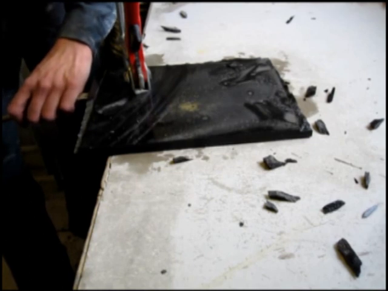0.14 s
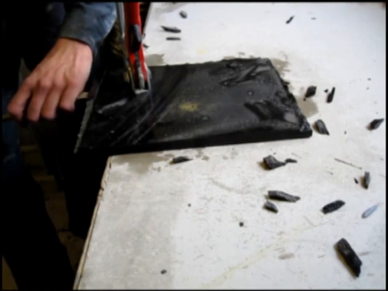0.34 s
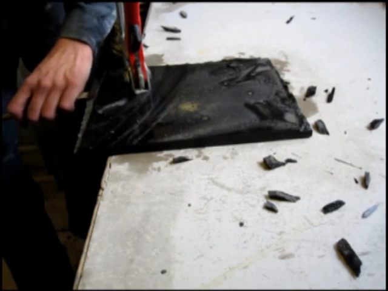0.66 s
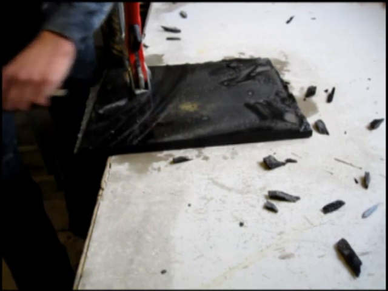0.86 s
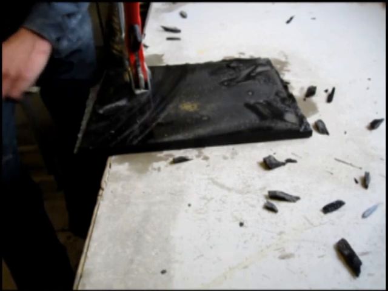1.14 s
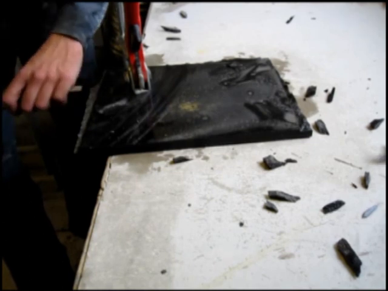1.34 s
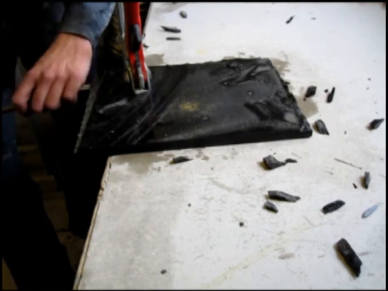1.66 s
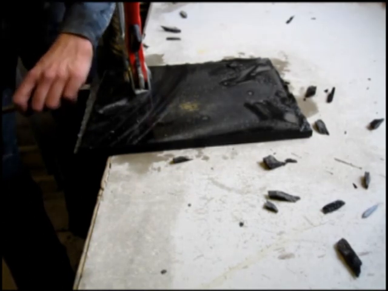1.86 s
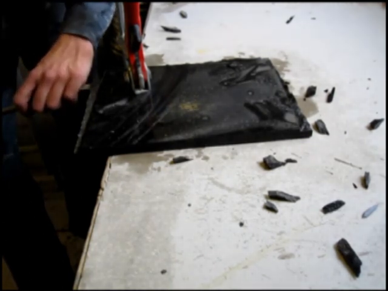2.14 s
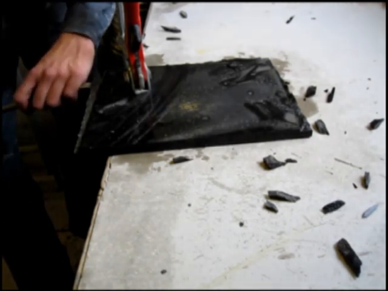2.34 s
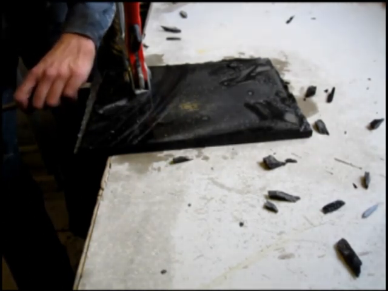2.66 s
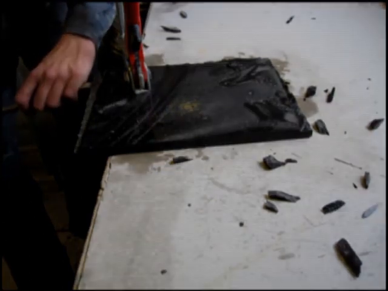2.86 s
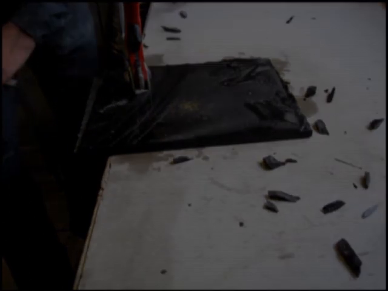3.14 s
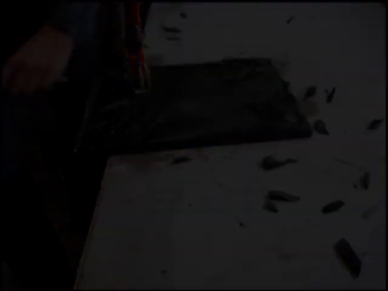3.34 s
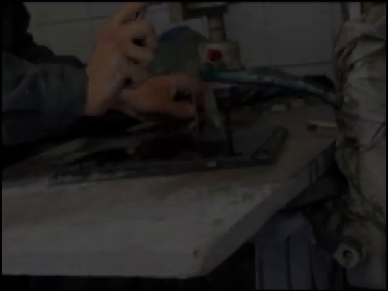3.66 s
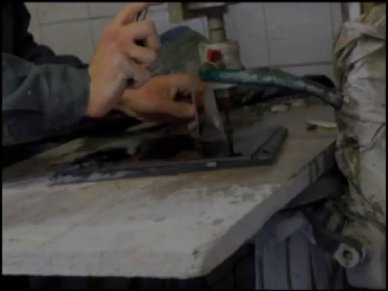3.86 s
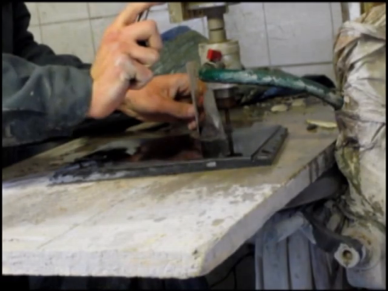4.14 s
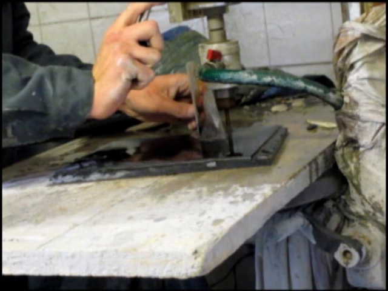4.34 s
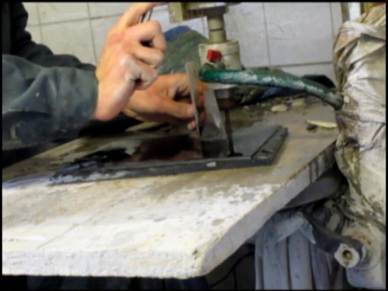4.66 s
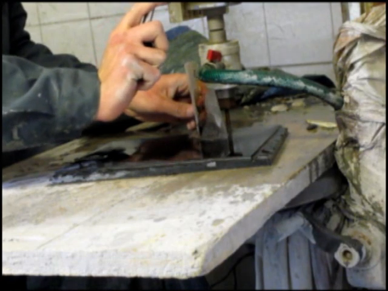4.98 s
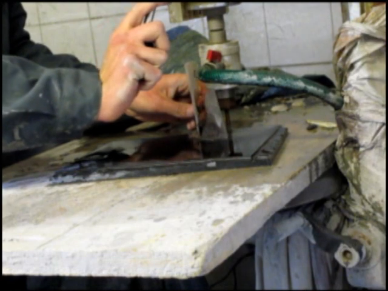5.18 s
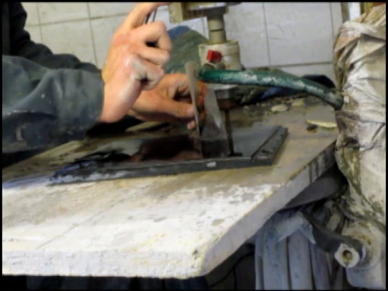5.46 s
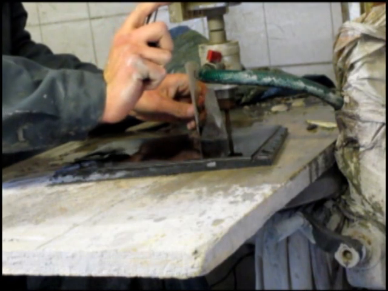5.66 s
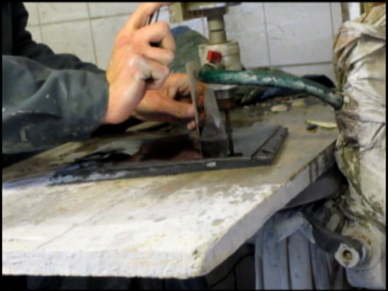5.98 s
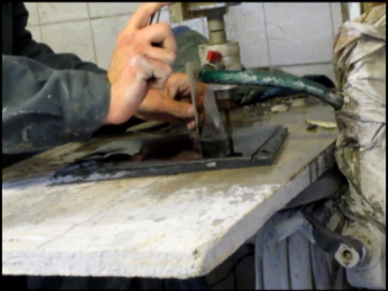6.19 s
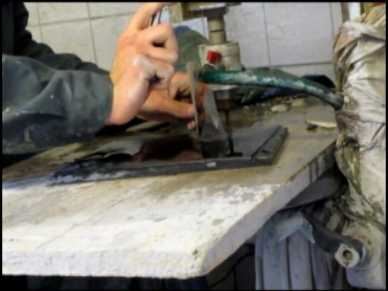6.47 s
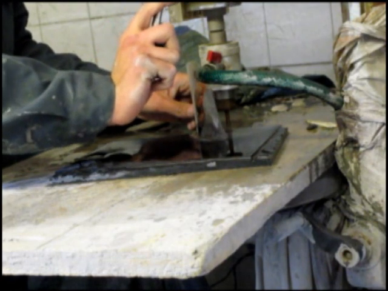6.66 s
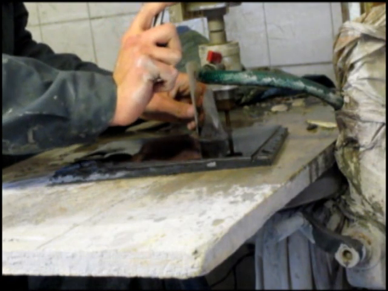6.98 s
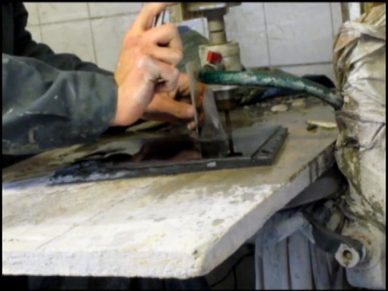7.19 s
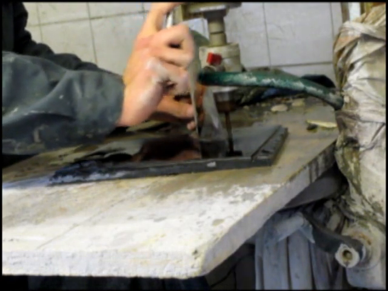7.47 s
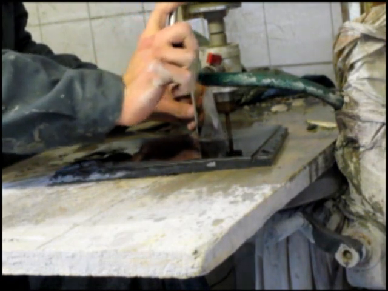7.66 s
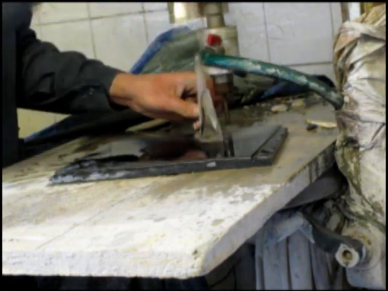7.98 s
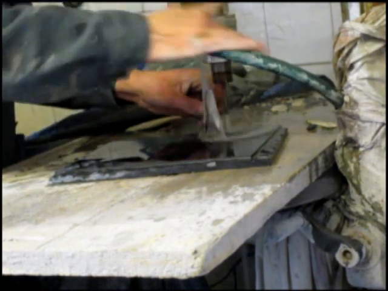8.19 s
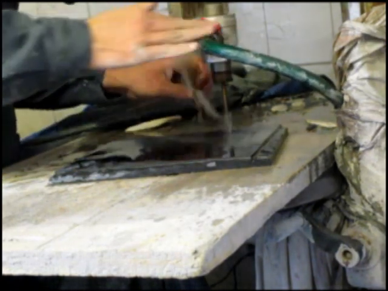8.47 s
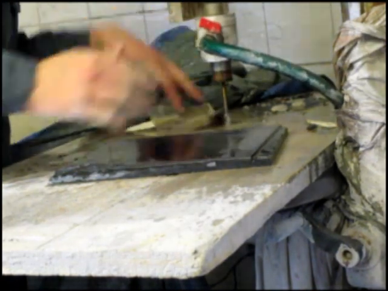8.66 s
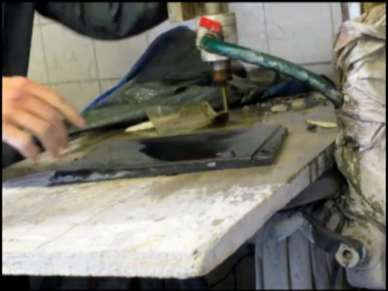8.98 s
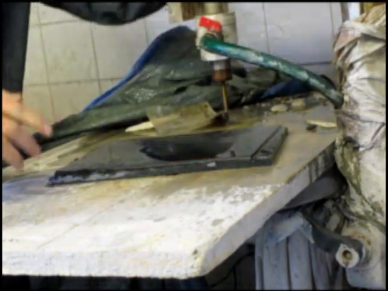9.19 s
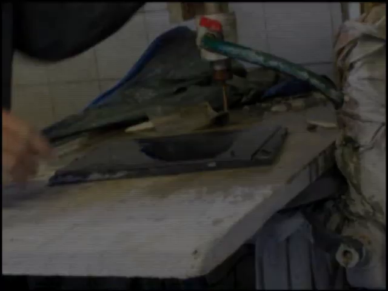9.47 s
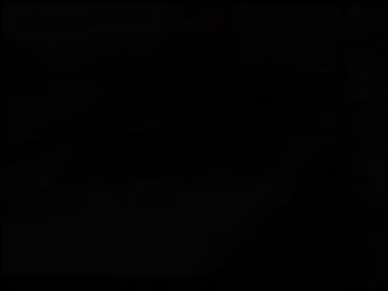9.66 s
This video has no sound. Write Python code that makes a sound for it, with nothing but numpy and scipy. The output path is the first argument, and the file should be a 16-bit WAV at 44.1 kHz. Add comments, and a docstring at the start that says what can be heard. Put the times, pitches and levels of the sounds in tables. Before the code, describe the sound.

A faint hiss and small motor whirr fill a tiled workshop while a stone slab shifts softly on a bench. A hammer strikes a chisel at about 0.8, 1.3 and 3 seconds, giving sharp stone cracks with a short room echo. The first and last thud the bench and ring the steel; the second is crunchier, with flakes clicking down close by. Quiet knocks and scrapes follow around 1.8 to 2.4 seconds. Everything fades out by 3.5 seconds.

A water-fed drill then fades in, grinding steadily into stone over a rough motor hum. At about 7.5 seconds it lifts and spins free with a high singing tone, a click and a hiss of spray. Small splashes follow from 8 to 9.2 seconds. The splash guard clinks near 9.5 seconds as the drill fades away, ending around 9.7 seconds.

```python
"""A stonemason's tiled workshop. Three hammer blows on a chisel chip a granite slab: the stone cracks,
the bench thuds, the steel rings, flakes land. Gain control ducks each blow and lets the room swell back.
After a fade, a water-fed drill grinds into the slab, is lifted and runs free, flinging spray;
its splash guard and feed lever click."""
import sys
import numpy as np
from scipy import signal
from scipy.fft import rfft, irfft, next_fast_len
from scipy.io import wavfile
from scipy.ndimage import uniform_filter1d, map_coordinates

SR = 44100
rng = np.random.default_rng(int(sys.argv[2]) if len(sys.argv) > 2 else 0)


def generate_wav(sig):
    """Save sig (samples, or channels by samples) to the path in sys.argv[1] as 16-bit PCM at SR."""
    pcm = np.round(np.clip(np.atleast_2d(sig).T, -1, 1) * 32767).astype(np.int16)
    wavfile.write(sys.argv[1], SR, pcm)


N = 433493
T = np.arange(N) / SR
EVENT_SAMPLES = SR // 2
DRILL_START_S, LIFT_S, END_S = 3.52, 7.45, 9.739


# hammer blows: start_s, crack_db, thud_db, ring_db, crunch_db, touch_lead_s, touch_db, rock_db
HAMMER_BLOWS = [(0.8243, 10, 5, 1.5, -6, 0.011, -24.5, -6),
                (1.3453, 3, -12.5, -31.5, 4.5, .016, -14.5, -38),
                (2.9854, 13, 6, -9.5, -10.5, 0.019, -34, -18)]
# chisel and slab modes, before tilt: pitch_hz, level_db
CHISEL_MODES = [(1055, -20), (1147, -2), (2046, -12.5), (2476, 8), (2536, 4.5), (2789, -7.5), (3381, -10),
                (3817, -20.5), (4005, 3.5), (4048, 3.5), (5044, -17), (5523, -10), (7095, -21), (8463, -15),
                (10520, -27)]
# bench frame modes, before tilt: pitch_hz, level_db
BENCH_FRAME_MODES = [(545, 3.5), (830, 0), (375, -4)]
def chisel(tilt_db_per_oct=5, ring_t60_s=0.11, drone_t60_s=2.1):
    """The edge touches lightly; the blow then cracks the stone and rings the steel and the bench."""
    out = np.zeros(N)
    for start_s, crack_db, thud_db, ring_db, crunch_db, touch_lead_s, touch_db, _ in HAMMER_BLOWS:
        touch = contact(touch_db, thud_db - 31.5, tilt_db_per_oct=9, t60_s=0.006)
        add(out, start_s - touch_lead_s, touch)
        add(out, start_s, contact(crack_db, thud_db, tilt_db_per_oct, t60_s=0.033))
        ring = amp(ring_db) * ringing(CHISEL_MODES, tilt_db_per_oct) * decay(ring_t60_s, rise_s=0.00077)
        crunch = amp(crunch_db) * band(4540, width_oct=0.67) * decay(0.035, rise_s=0.00068)
        add(out, start_s, room(np.pad(ring + crunch, (0, EVENT_SAMPLES)), wet_db=-3))
        drone = amp(thud_db - 41) * ringing(BENCH_FRAME_MODES, tilt_db_per_oct)
        add(out, start_s, drone * decay(drone_t60_s, rise_s=0.01))
    return out


# stone crack, before tilt: freq_hz, density_db
CRACK_SPECTRUM = [(180, -43.5), (300, -22.5), (593, -22), (870, -10.5), (1120, 6), (1660, -5.5), (2000, 6),
                  (2980, -3.5), (4020, -3), (4520, -7), (8640, -16), (12700, -25.5), (16000, -45.5)]
# slab thumping the bench: freq_hz, density_db
THUD_SPECTRUM = [(25, -17.5), (70, -18.5), (140, -14.5), (250, -8), (480, -3), (750, -1.5), (1100, 0.5),
                 (1600, -10.5), (5000, -42)]
def contact(crack_db, thud_db, tilt_db_per_oct, t60_s):
    """Steel on stone: a crack, and a thud the bench radiates all round, heard mostly off the walls."""
    tilted = [(hz, db + tilt_db_per_oct * np.log2(hz)) for hz, db in CRACK_SPECTRUM]
    crack = amp(crack_db) * noise(tilted, EVENT_SAMPLES) * decay(t60_s, rise_s=0.00034)
    thud = amp(thud_db) * pulse(THUD_SPECTRUM)
    tail_pad = (0, EVENT_SAMPLES)
    return room(np.pad(crack, tail_pad), wet_db=-4) + room(np.pad(thud, tail_pad), wet_db=8)


# flakes and grit landing: start_s, level_db, t60_s
FLAKE_LANDINGS = [(1.141, -26, 0.0037), (1.211, -37.5, .006), (1.36, 11, 0.0036), (1.4835, 6, 0.0018),
                  (1.722, -37, 0.059), (2.36, -41.5, 0.055)]
# sliding stone: freq_hz, density_db
SCRAPE_SPECTRUM = [(300, -29), (650, -2.5), (950, 2), (1700, -1), (3000, -5.5), (5000, -10), (9000, -26.5),
                   (16000, -37)]
def flakes():
    """Flakes click on the bench close by, then skitter."""
    clicks, skitters = np.zeros(N), np.zeros(N)
    for start_s, level_db, t60_s in FLAKE_LANDINGS:
        click = amp(level_db) * noise(CRACK_SPECTRUM, EVENT_SAMPLES)
        skitter = amp(level_db - 20.5) * noise(SCRAPE_SPECTRUM, EVENT_SAMPLES)
        add(clicks, start_s, click * decay(t60_s, rise_s=0.0002))
        add(skitters, start_s, skitter * decay(0.057, rise_s=0.004))
    return room(clicks, wet_db=-10) + room(skitters, wet_db=-1)


# slab dropping back: freq_hz, density_db
ROCK_SPECTRUM = [(30, -19), (80, -9), (130, -3), (300, -0.5), (520, 4), (800, 9), (1500, -38)]
# slab and chisel shifted on the bench: start_s, knock_db, scrape_db, t60_s
SLAB_SHIFTS = [(0.0, -36.5, -55, 0.069), (0.182, -42, -35.5, 0.27), (0.234, -31, -45.5, 0.13),
               (1.76, -25, -53, 0.082), (1.988, -35, -27, 0.066), (2.03, -43, -29.5, 0.17),
               (2.29, -33, -45, 0.31), (2.356, -32.5, -35.5, 0.099)]
# bench knock: freq_hz, density_db
KNOCK_SPECTRUM = [(100, -17), (300, -10), (480, -1), (750, 3), (1100, 2.5), (1600, -14.5), (4000, -33)]
def slab(rock_delay_s=0.133, rise_per_t60=0.062):
    """The slab, tipped by each blow, drops back; it knocks and scrapes as it is reset."""
    out = np.zeros(N)
    for start_s, *_, rock_db in HAMMER_BLOWS:
        rock = amp(rock_db) * noise(ROCK_SPECTRUM, EVENT_SAMPLES)
        add(out, start_s + rock_delay_s, rock * decay(0.082, rise_s=0.0099))
    for start_s, knock_db, scrape_db, t60_s in SLAB_SHIFTS:
        knock = amp(knock_db) * noise(KNOCK_SPECTRUM, EVENT_SAMPLES)
        scrape = amp(scrape_db) * noise(SCRAPE_SPECTRUM, EVENT_SAMPLES)
        add(out, start_s, (knock + scrape) * decay(t60_s, rise_per_t60 * t60_s))
    return room(out, wet_db=-1)


# shaking drill frame: freq_hz, density_db
FRAME_SPECTRUM = [(25, -33), (65, -19), (100, -18.5), (130, -23), (165, -18), (190, -2), (235, -7.5),
                  (290, 5), (340, -11), (410, 3.5), (455, -0.5), (530, 3), (640, -6), (900, -32)]
def drill(lift_length_s=0.057):
    """The drill grinds, its frame steadied by the stone, then is lifted and runs free."""
    free = ramp(LIFT_S, lift_length_s)
    pressed, lifted = np.sqrt(1 - free), np.sqrt(free)
    frame = amp(-27.5 + 4 * free) * noise(FRAME_SPECTRUM)
    bit = amp(-14.5) * (pressed * grinding_bit() + lifted * free_bit())
    rush = frame + bit + spray(pressed, lifted)
    hum = drill_motor(pressed, lifted)
    return amp(-0.96) * room(rush, wet_db=-10) + hum


# bit in the stone: freq_hz, density_db
GRIND_SPECTRUM = [(350, -45), (600, -20.5), (823, -1.5), (931, -7), (1130, -1.5), (1530, -8.5), (1880, -11),
                  (2070, -7), (2540, -10), (3250, -15), (4160, -16.5), (4780, -22), (8050, -27.5),
                  (12000, -34), (16000, -53.5)]
# bit resonances in the hole: centre_hz, width_hz, level_db
GRIND_RESONANCES = [(2420, 480, -11.5), (3590, 350, -1), (4140, 180, -3.5), (8100, 740, -14)]
def grinding_bit(grit_rate_hz=300, slap_rate_hz=25):
    """Grit catches the bit rapidly; water slaps more slowly."""
    flutter_db = 0.89 * wobble(grit_rate_hz) + 0.79 * wobble(slap_rate_hz)
    grind = amp(-1.46) * noise(GRIND_SPECTRUM) + amp(-15) * resonant_noise(GRIND_RESONANCES)
    return amp(flutter_db) * grind


# bit spinning wet: freq_hz, density_db
SPIN_SPECTRUM = [(60, -54), (350, -24), (600, -34), (661, -4), (858, -7), (984, -5.5), (1160, 0),
                 (1260, -3), (1370, -2.5), (2270, -11), (3680, -15), (5710, -26), (6640, -44), (7730, -28),
                 (11500, -32.5), (16000, -44.5)]
# free bit resonances: centre_hz, width_hz, level_db
SING_RESONANCES = [(3885, 150, 4.5), (4920, 200, -18), (6700, 1400, -4.5), (10280, 670, -7),
                   (11820, 940, -7.5)]
def free_bit():
    """The lifted bit spins in the water and sings."""
    spin = amp(-1.4 + 0.91 * wobble(300) + wobble(30)) * noise(SPIN_SPECTRUM)
    sing = amp(-16 + 1.8 * wobble(5.4)) * resonant_noise(SING_RESONANCES)
    return spin + sing


# motor and spindle under load: pitch_hz, level_db
LOADED_TONES = [(279.9, -30.5), (409.1, -43), (511.4, -36.5), (662.1, -34.5), (742.9, -34), (807.5, -26.5),
                (839.8, -24), (1034, -30.5), (1125, -25.5), (1405, -30.5), (2024, -60), (2315, -31.5),
                (2476, -44), (2509, -32.5), (2789, -34.5)]
# motor and spindle running free: pitch_hz, level_db
FREE_TONES = [(301.5, -34.5), (414.5, -34.5), (855.9, -32.5), (1066, -30.5), (1136, -33), (1335, -29.5),
              (1410, -54), (1776, -41.5), (1981, -36.5), (3138, -37), (3801, -41), (6788, -61)]
def drill_motor(pressed, lifted):
    """Motor and spindle tones shift and roughen as the load comes off."""
    loaded = amp(-2.5) * tones(LOADED_TONES, rate_hz=20, roughness=0.61)
    unloaded = amp(-1) * tones(FREE_TONES, rate_hz=18, roughness=2.1)
    return pressed * loaded + lifted * unloaded


# water spray: freq_hz, density_db
SPRAY_SPECTRUM = [(3000, -20), (5500, -3), (6900, 13.5), (8500, -1), (10200, 1), (12000, 3.5),
                  (14000, -3.5), (15700, -13.5)]
def spray(pressed, lifted, hold_s=0.65, fall_db_per_s=43.5):
    """Water seeps from the hole; the pent-up rest is flung off after the lift."""
    seep = pressed * amp(-56.5)
    gush = lifted * amp(-37 - fall_db_per_s * np.maximum(T - LIFT_S - hold_s, 0))
    flutter_db = 1.5 * wobble(900) + 0.8 * wobble(20)
    return (seep + gush) * amp(flutter_db) * noise(SPRAY_SPECTRUM)


# guard and lever clicks: start_s, click_db, centre_hz, width_oct, t60_s, ring_db
GUARD_CLICKS = [(7.5897, -6.5, 11000, 0.33, 0.011, -51.5), (9.038, -26.5, 9000, 0.65, .08, -57.5),
                (9.475, -7.5, 5800, 0.79, 0.034, -30)]
# guard modes: pitch_hz, level_db
GUARD_MODES = [(3790, -8.5), (4743, 2), (5093, -14), (6250, -13), (8700, -24), (11725, -15.5)]
def guard(ring_t60_s=0.6):
    """The splash guard and feed lever click and clink as they are handled."""
    out = np.zeros(N)
    for start_s, click_db, centre_hz, width_oct, t60_s, ring_db in GUARD_CLICKS:
        add(out, start_s, amp(click_db) * band(centre_hz, width_oct) * decay(t60_s, rise_s=0.0004))
        add(out, start_s, amp(ring_db) * ringing(GUARD_MODES) * decay(ring_t60_s, rise_s=0.0005))
    return room(out, wet_db=0)


# water off the free bit: start_s, level_db, centre_hz, t60_s
WATER_GOUTS = [(7.9, -28.5, 7000, 0.65), (8.052, -22, 3200, 0.68), (8.832, -15.5, 2600, .15),
               (9.039, -12.5, 2170, 0.12), (9.124, -20, 2000, 0.11), (9.22, -22.5, 4000, 0.74)]
def splashes():
    """Gouts of water slap the guard and the slab."""
    out = np.zeros(N)
    for start_s, level_db, centre_hz, t60_s in WATER_GOUTS:
        add(out, start_s, amp(level_db) * band(centre_hz, width_oct=0.38) * decay(t60_s, rise_s=0.0066))
    return room(out, wet_db=-5.5)


# workshop hiss: freq_hz, density_db
HISS_SPECTRUM = [(15, -53.5), (25, -7), (202, -4.5), (621, -10), (1180, -1.5), (1720, -6.5), (1910, -28),
                 (2780, -20.5), (3010, -18), (4870, -12.5), (6370, -18.5), (8100, -20.5), (8780, -21),
                 (12100, -19.5), (15000, -82)]
# small motor whirr: centre_hz, width_hz, level_db
WHIRR_RESONANCES = [(1124, 130, -3), (1890, 140, -11), (2040, 130, -5.5), (2258, 50, -7), (2480, 99, -9.5),
                    (2740, 150, -11.5)]
# small motor whine: pitch_hz, level_db
WHINE_TONES = [(1152, -60.5), (1179, -57), (1895, -55), (2180, -58), (5830, -71), (7870, -62.5)]
def workshop():
    """A small motor whirrs and whines over the hiss."""
    hiss = amp(-50.5) * noise(HISS_SPECTRUM)
    whirr = amp(-47.5) * resonant_noise(WHIRR_RESONANCES)
    return hiss + whirr + tones(WHINE_TONES, rate_hz=28, roughness=0.06)


# tiled room decay: freq_hz, t60_s
ROOM_DECAY = [(60, 0.51), (250, 0.93), (600, 0.48), (1500, 0.46), (4000, 0.39), (8000, 0.34), (15000, 0.3)]
def room(x, wet_db, rise_s=0.00068):
    """x plus reflections off the tiles; each frequency dies at its own rate."""
    hz, t, bins = signal.stft(rng.standard_normal(SR), SR, nperseg=256)
    t60_s = log_interp(ROOM_DECAY, hz)[:, None]
    _, tail = signal.istft(bins * amp(-60 * t / t60_s), SR, nperseg=256)
    tail *= 1 - np.exp(-T[:len(tail)] / rise_s)
    return x + amp(wet_db) * signal.fftconvolve(x, tail / np.linalg.norm(tail))[:len(x)]


def amp(db):
    """Decibels to gain."""
    return 10 ** (np.asarray(db) / 20)


def unit_rms(x):
    """x at rms 1."""
    return x / np.sqrt(np.mean(np.abs(x) ** 2) + 1e-20)


def log_interp(points, hz):
    """Interpolate (freq_hz, value) points on a log axis."""
    freqs_hz, values = np.transpose(points)
    return np.interp(np.log(hz + 1), np.log(freqs_hz + 1), values)


def add(track, start_s, sound):
    """Mix sound into track."""
    part = track[max(round(start_s * SR), 0):][:len(sound)]
    part += sound[:len(part)]


def ramp(start_s, length_s):
    """Linear rise, 0 to 1."""
    return np.clip((T - start_s) / length_s, 0, 1)


def decay(t60_s, rise_s):
    """Event envelope: rise, then exponential fall."""
    t = T[:EVENT_SAMPLES]
    return amp(-60 * t / t60_s) * (1 - np.exp(-t / rise_s))


def wobble(rate_hz):
    """Smooth random curve, rate_hz knots a second."""
    knots = rng.standard_normal(int(N * rate_hz / SR) + 4)
    return np.interp(T, T[::32], map_coordinates(knots, [T[::32] * rate_hz]))


def filtered(x, response):
    """Zero-phase filter with gain response(hz)."""
    size = next_fast_len(len(x) + SR // 4)
    return irfft(rfft(x, size) * response(np.fft.rfftfreq(size, 1 / SR)), size)[:len(x)]


def noise(spectrum, size=N):
    """Coloured noise, rms 1."""
    return unit_rms(filtered(rng.standard_normal(size), lambda hz: amp(log_interp(spectrum, hz))))


def resonant_noise(peaks):
    """Noise through resonances, rms 1."""
    def response(hz):
        return sum(amp(db) / (1 + (2 * (hz - centre_hz) / width_hz) ** 2)
                   for centre_hz, width_hz, db in peaks)
    return unit_rms(filtered(rng.standard_normal(N), response))


def band(centre_hz, width_oct):
    """Event-length noise in a Gaussian band, rms 1."""
    bell = lambda hz: np.exp(-(np.log2((hz + 1) / centre_hz) / width_oct) ** 2 / 2)
    return unit_rms(filtered(rng.standard_normal(EVENT_SAMPLES), bell))


def ringing(modes, tilt_db_per_oct=0):
    """Event-length modes at random phases, rms 1."""
    t = T[:EVENT_SAMPLES]
    return unit_rms(sum(amp(db + tilt_db_per_oct * np.log2(hz))
                        * np.sin(2 * np.pi * (hz * t + rng.random())) for hz, db in modes))


def tones(lines, rate_hz, roughness):
    """Machine tones fluttering in level and phase, the high ones most."""
    out = np.zeros(N)
    for pitch_hz, level_db in lines:
        depth = roughness * np.sqrt(pitch_hz / 1000)
        flutter = unit_rms(1 + depth * (wobble(rate_hz) + 1j * wobble(rate_hz)))
        out += amp(level_db) * np.sqrt(2) * (flutter * np.exp(2j * np.pi * pitch_hz * T)).real
    return out


def pulse(spectrum, size=8192):
    """Minimum-phase pulse, peak 1."""
    magnitude = amp(log_interp(spectrum, np.fft.rfftfreq(size, 1 / SR)))
    cepstrum = irfft(np.log(magnitude))
    wave = irfft(np.exp(rfft(2 * cepstrum[:size // 2], size)))
    return np.pad(wave / np.abs(wave).max(), (0, EVENT_SAMPLES - size))


def gain_control(x, limit_db=-9, attack_s=0.0029, release_db_per_s=100):
    """Peaks pull the gain down fast; it climbs back at a fixed rate."""
    power = np.abs(uniform_filter1d(x[0] ** 2, size=96)) + 1e-12
    over_db = np.maximum(10 * np.log10(power) - limit_db, 0)
    held_db = np.maximum.accumulate(over_db + release_db_per_s * T) - release_db_per_s * T
    pole = np.exp(-1 / (attack_s * SR))
    return x * amp(-signal.lfilter([1 - pole], [1, -pole], held_db))


def fades(in_s=0.78, out_s=0.58):
    """Chiselling fades out; drilling fades in and out."""
    fade_out = lambda end_s: 1 - ramp(end_s - out_s, out_s)
    return fade_out(DRILL_START_S) + ramp(DRILL_START_S, in_s) * fade_out(END_S)


def scene():
    """Chiselling, then drilling; dual mono."""
    chiselling = amp(2) * (chisel() + flakes() + slab() + workshop())
    drilling = amp(-0.81) * (drill() + guard() + splashes())
    mono = np.where(T < DRILL_START_S, chiselling, drilling)
    return np.array([mono, mono])


def record(dry):
    """Gain control, clipping of the blows' onsets, fades, low-pass."""
    ceiling, stop_hz, edge_hz = 0.85, 16150, 400
    faded = np.clip(gain_control(dry), -ceiling, ceiling) * fades()
    low_pass = lambda hz: np.clip((stop_hz - hz) / edge_hz, 0, 1)
    return np.array([filtered(channel, low_pass) for channel in faded])


dry = scene()
out = record(dry)
generate_wav(out)
```